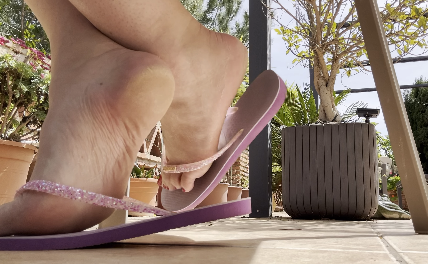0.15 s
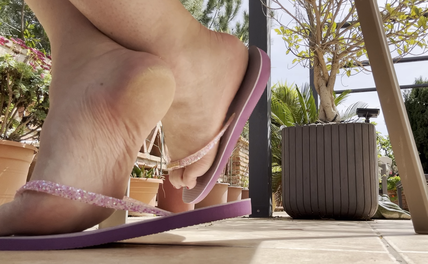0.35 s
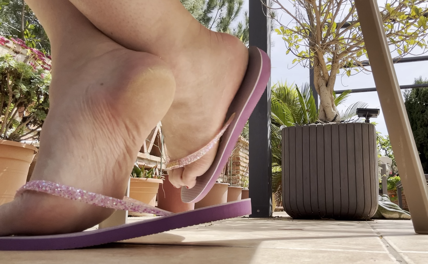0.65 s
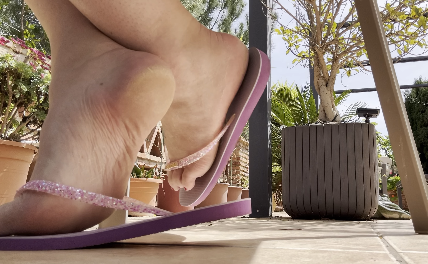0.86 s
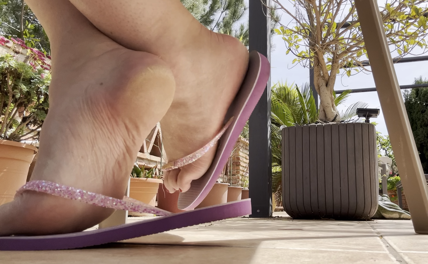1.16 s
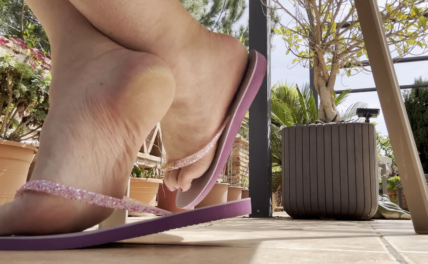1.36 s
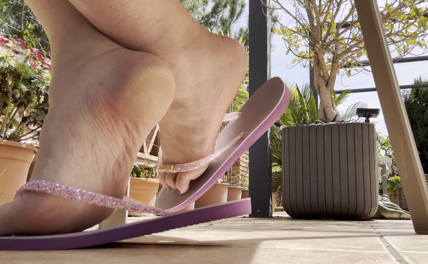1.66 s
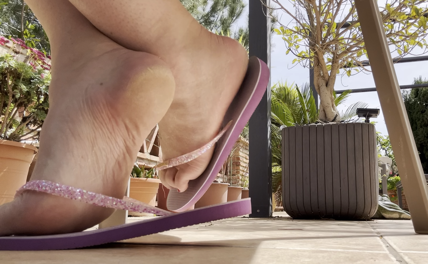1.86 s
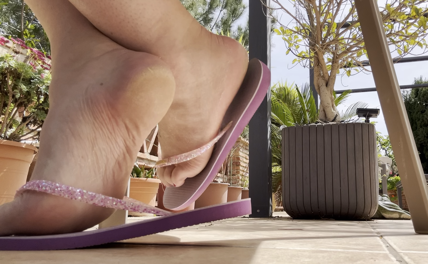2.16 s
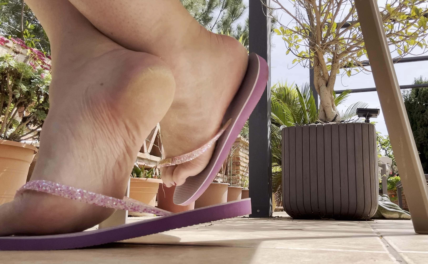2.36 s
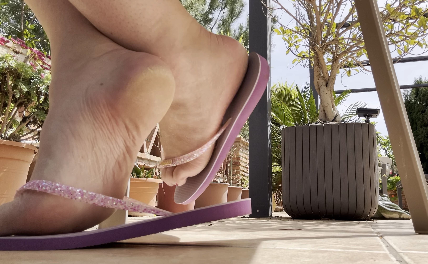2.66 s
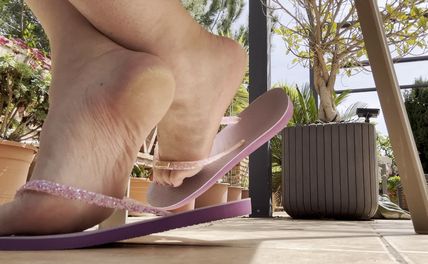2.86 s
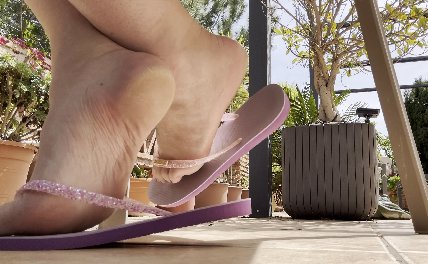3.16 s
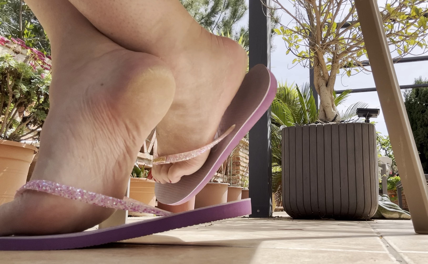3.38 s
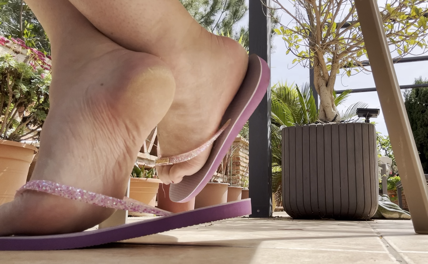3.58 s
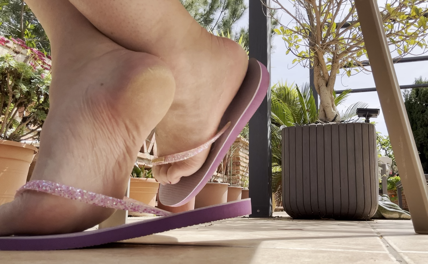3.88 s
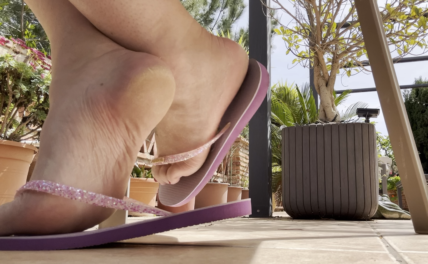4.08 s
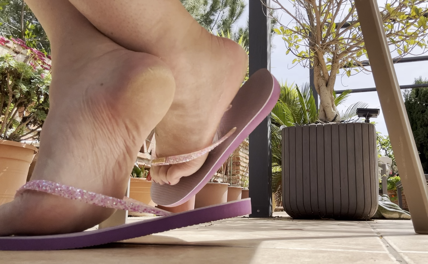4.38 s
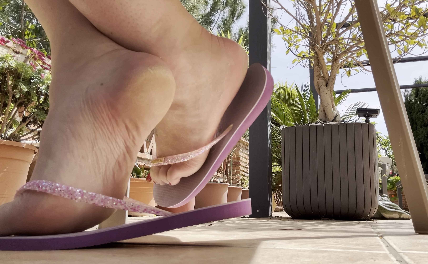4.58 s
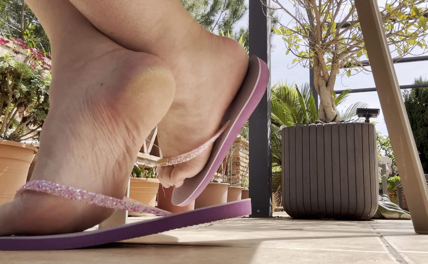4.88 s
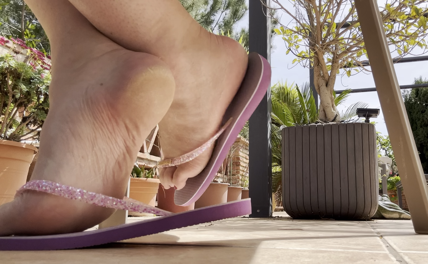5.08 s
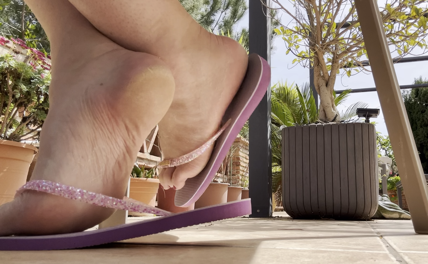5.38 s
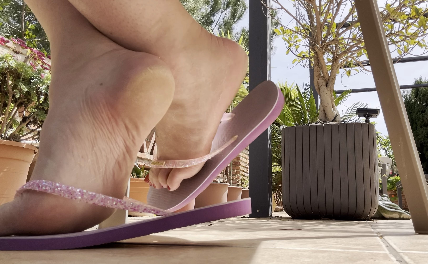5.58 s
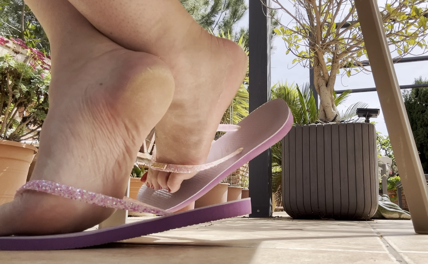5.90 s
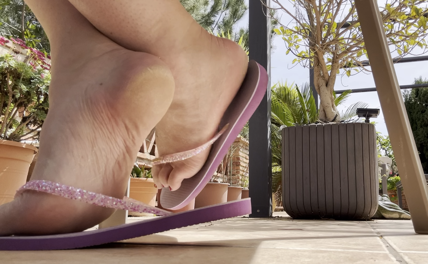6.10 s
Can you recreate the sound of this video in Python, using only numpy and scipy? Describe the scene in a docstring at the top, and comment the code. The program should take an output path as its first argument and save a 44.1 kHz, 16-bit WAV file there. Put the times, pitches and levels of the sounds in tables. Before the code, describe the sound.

A foam flip-flop slaps a bare heel about three times a second, crisp and close, over faint outdoor hum and low wind rumbles.

```python
"""On a tiled terrace, a foam sandal hanging from a foot slaps the heel about three times a second, near a phone.
Each slap adds shaped noise (first touch with escaping air, crack) to fading sine tones (hollow pop, thud, sway).
Delayed copies and a fading noise tail are the answer of the tiles and near surfaces.
Wind is noise that swells on the microphone ports; far traffic, leaves and the microphones are steadier noise.
The phone makes the bass mono below a drifting corner and cuts the highest treble."""
import sys
import numpy as np
from scipy import signal
from scipy.fft import rfft, irfft, next_fast_len
from scipy.io import wavfile
from scipy.ndimage import uniform_filter1d, map_coordinates

SR = 44100
rng = np.random.default_rng(int(sys.argv[2]) if len(sys.argv) > 2 else 0)


def unload_audio(sound):
    """Save the sound as a 16-bit wav file, at the path given as the first command line argument."""
    columns = np.transpose(np.atleast_2d(sound))
    # keep every value between -1 and 1, then stretch to whole-number steps
    steps = np.round(np.clip(columns, -1, 1) * 32767)
    wavfile.write(sys.argv[1], SR, steps.astype(np.int16))


N = 275184

# Far surroundings: t/s, level/dB
FAR_LEVEL = [(0.0, -54.5), (0.22, -56.5), (0.48, -51), (0.94, -52), (1.51, -52.5), (2.83, -51.5),
             (3.3, -53), (3.58, -53.5), (3.72, -51.5), (4.22, -56.5), (5.13, -56.5), (5.61, -53.5),
             (6.24, -57.5)]
# Colour of the far hum: f/Hz, relative density/dB per Hz
HUM_COLOUR = [(40, -120), (90, -28), (180, -5.5), (280, -3), (380, -1), (520, -6), (750, -11.5), (950, -17),
              (1300, -57), (3000, -120)]
# Colour of the leaves and microphone hiss: f/Hz, relative density/dB per Hz
HISS_COLOUR = [(600, 1), (1000, 1.5), (2000, -2.5), (4000, -6.5), (7000, -9), (10000, -21), (13500, -12.5),
               (15800, -35), (16300, -50)]
# How alike the surroundings are left and right: f/Hz, likeness (-1 to 1)
FAR_LIKENESS = [(200, 1), (640, 0.24), (1400, -0.31), (3100, -0.13), (7000, 0.27), (15000, -0.34)]
HISS_DB, HISS_FOLLOWS = -56.5, 0.56  # dB when the far level is -53 dB; share of that level's swings

# Strength of the wind: t/s, deep buffeting/dB, faster buffeting/dB
WIND_LEVELS = [(0, -66, -67), (.7, -66, -62.5), (1.0, -55, -53), (1.6, -55.5, -50.5), (2.2, -49, -50),
               (2.5, -51, -57.5), (3.1, -52.5, -51), (3.3, -44.5, -53), (3.48, -53, -54),
               (3.58, -35.5, -35.5), (3.77, -39, -30.5), (3.82, -37, -20), (3.86, -35.5, -36.5),
               (4.05, -33, -38.5), (4.2, -56, -46), (4.4, -57.5, -49.5), (4.7, -48, -44), (4.92, -52, -52),
               (5.1, -53, -63), (5.35, -57, -54.5), (5.6, -50, -42), (5.87, -49.5, -48), (6.05, -65.5, -62),
               (6.24, -59, -77)]
# Colour of the deep buffeting: f/Hz, relative density/dB per Hz
DEEP_COLOUR = [(10, -120), (18, -41), (30, -15), (45, 4.5), (62, 13), (80, 6.5), (110, -7.5), (160, -58),
               (300, -120)]
# Colour of the faster buffeting: f/Hz, relative density/dB per Hz
FAST_COLOUR = [(25, -120), (60, -23), (90, -2.5), (120, 1), (160, -5.5), (220, -14), (320, -32.5),
               (700, -120)]
# Colour of the sharper eddies: f/Hz, relative density/dB per Hz
PUFF_COLOUR = [(40, -120), (100, -26), (200, 1.5), (400, -3), (700, -31), (1200, -38), (3000, -120)]
# Sharper eddies: t/s, level/dB, half length/s
PUFFS = [(3.78, -38, .04), (3.95, -48, .02), (4.47, -41.5, .03), (4.94, -45, .008), (5.7, -46, .02)]
# Single deep eddies that thump on the ports: t/s, level/dB
THUMPS = [(1.02, -46), (1.58, -44.5), (1.84, -45), (2.015, -36.5), (2.09, -32.5), (2.17, -37), (2.28, -41),
          (2.455, -36.5), (3.17, -33.5), (3.42, -50), (3.6, -29), (3.65, -30.5), (4.1, -36.5), (4.55, -46),
          (4.7, -43), (4.765, -42), (4.84, -44), (5.25, -48), (5.6, -42), (5.685, -44)]
THUMP_HALF_S = 0.014
# How alike the deep wind is on the two ports: f/Hz, likeness (-1 to 1)
DEEP_LIKENESS = [(45, 0.88), (80, 0.34)]
# The same for the faster wind: f/Hz, likeness (-1 to 1)
FAST_LIKENESS = [(30, 0.2)]

# Slaps: t/s, crack/dB (scales the whole slap), then against the crack:
# pop/dB, thud/dB, snap/dB, sheen/dB, first touch/dB, sway/dB
SLAPS = [(0.257, -17, -3.5, -6.5, -5.5, 0, -23.5, -27), (0.5586, -17.5, -2.5, -4.5, -4, -3.5, -22, -22),
         (0.8201, -24, -8, -8.5, -6, 0.5, -26, -33), (1.0905, -16, -3, -6, -5, -3, -22, -10.5),
         (1.3879, -16, -2.5, -7.5, -6.5, 1.5, -25, -13), (1.7184, -17.5, -3, -6.5, -4, -5, -27, -12),
         (2.0375, -19.5, -6.5, -9.5, -6, 1.5, -28, -13), (2.3293, -21, -3.5, -10, -10, -3.5, -23, -9),
         (2.627, -14, -7.5, -14, -11.5, -7, -21.5, -14),
         (2.9314, -15, -3.5, -10.5, -2.5, 2.5, -28.5, -10.5),
         (3.2296, -15, -4.5, -10, -5.5, -2, -27.5, -10), (3.5304, -16, -3, -8, -6.5, -1.5, -22, -19),
         (3.7762, -19, -2.5, -7.5, -4, 2.5, -21.5, -18), (4.021, -23.5, -3, -5.5, -5.5, -3, -27.5, -16),
         (4.2756, -16.5, -2, -8, -3.5, -0.5, -24, -33), (4.4825, -24, -3.5, -7.5, -8, -5.5, -28, -22),
         (4.8004, -15.5, -4, -8.5, -6, -4, -27, -26), (5.0945, -19, -1.5, -7, -1.5, -3, -26, -18),
         (5.3953, -16, -4, -10, -3.5, -4, -26, -19), (5.6981, -17.5, -7, -12, -9, -9, -33, -28),
         (5.9858, -18.5, -1.5, -11, -2.5, -3, -27, -17)]
# Escaping air: f/Hz, relative level/dB
SQUEEZE_COLOUR = [(300, -38), (700, 9), (2000, 4), (5000, 0), (8000, -4.5), (10500, -22), (13500, -1),
                  (17000, -29)]
# Main band of the crack: f/Hz, relative level/dB
CRACK_COLOUR = [(900, -51), (1700, -15.5), (2300, -14), (3100, 0.5), (3800, -4), (4500, 4), (5300, -8),
                (6500, -23)]
# Brighter snap within the crack: f/Hz, relative level/dB
SNAP_COLOUR = [(4800, -8.5), (5800, -0.5), (6600, -1), (7500, 0.5), (8800, -6), (9600, 0.5), (10500, -45),
               (11500, -46)]
# Highest sheen of the crack: f/Hz, relative level/dB
SHEEN_COLOUR = [(9500, -37), (11000, -2), (12500, -1), (13800, 8), (15000, 0.5), (15800, -14), (17000, -76)]
# Tones of the air pocket: f/Hz, relative level/dB, time to fade by 60 dB/s
POP_TONES = [(1197, 1.5, 0.013), (1309, 4, 0.011), (1493, -0.5, 0.013), (2230, 0.5, 0.011),
             (740, 6, 0.0085)]
# Tones of the bending sole: f/Hz, relative level/dB, time to fade by 60 dB/s
THUD_TONES = [(202, -4, 0.036), (255.6, -0.5, 0.029), (315.3, 0, 0.032), (374.6, -1, 0.029),
              (508, -11, 0.073)]
# Tones of the whole sole swinging back: f/Hz, relative level/dB, time to fade by 60 dB/s
SWAY_TONES = [(72.4, -3, 0.093), (135, -7, .03)]
SWAY_LATE_S = 0.0071
SCATTER_DB = 1.2  # typical change in each tone's strength from slap to slap
SMALL_SOLE_HZ = 165  # a small sole radiates little below this
# Echoes from the tiles, then near surfaces: delay/s, level/dB
ECHOES = [(.0008, -18.5), (.0095, -23), (0.0361, -29.5)]
# Fading of the terrace's tail: f/Hz, time to fade by 60 dB/s
TERRACE_FADE = [(200, 0.094), (1200, 0.082), (4000, 0.082), (8000, 0.077), (14000, 0.036)]
# Slap level at the left port over the right: f/Hz, level/dB
PORT_TILT = [(60, -8), (110, -6), (200, 2), (380, 9), (700, -2.5), (1290, -1), (2380, -2.5), (4400, -1),
             (8120, 1.5), (15000, -0.5)]
# Slap phase at the left port over the right: f/Hz, phase/radians
PORT_LEAD = [(0, 0), (600, 0), (900, .7), (1800, .9), (2500, 1.7), (3200, 2.3), (3600, 3.9), (4400, 4.4),
             (5000, 1.9), (6000, 2.6), (6700, 1), (7500, 0), (8800, -.9), (9200, -1.8), (17500, -12.7)]

# Corner below which the phone makes the sound mono: t/s, f/Hz
MONO_CORNER = [(0, 513), (1.15, 480), (2.6, 129), (3.5, 50.3), (4.65, 50), (4.85, 170), (5.8, 274),
               (6.24, 250)]
TOP_HZ = 17150  # the phone keeps nothing from here up


def amp(db):
    """Turn decibels into a plain multiplier."""
    return 10 ** (np.asarray(db) / 20)


def unit(x):
    """Scale a signal to an rms (average strength) of 1."""
    return x / np.sqrt(np.mean(x ** 2) + 1e-20)


def along(points, hz):
    """Read a curve of (frequency, value) points on a log frequency axis."""
    f, values = np.transpose(points)
    return np.interp(np.log(hz + 1), np.log(f + 1), values)


def curves(rows):
    """Draw each column after the time as one value per sample."""
    s, *columns = np.transpose(rows)
    return [np.interp(np.arange(N) / SR, s, column) for column in columns]


def wobble(rate):
    """A smooth random curve through rate random points a second."""
    knots = rng.standard_normal(int(N * rate / SR) + 4)
    return map_coordinates(knots, [np.arange(N) * rate / SR])


def filtered(x, response):
    """Change each frequency of x by the multiplier response(hz), which may be complex."""
    n = x.shape[-1]
    padded = next_fast_len(n + 4096)
    hz = np.fft.rfftfreq(padded, 1 / SR)
    return irfft(rfft(x, padded) * response(hz), padded)[..., :n]


def rush(spectrum, alike, patchy_db):
    """Stereo noise of rms 1: random patches vary its strength, mid and side set its likeness."""
    z = signal.stft(rng.standard_normal((2, N)), nperseg=512)[2]
    patches = uniform_filter1d(rng.standard_normal(z.shape[1:]), size=5, axis=0)
    patches = uniform_filter1d(patches, size=12, axis=1)
    pair = signal.istft(z * amp(patchy_db * unit(patches)), nperseg=512)[1][:, :N]

    def mid_side_gains(hz):
        # this angle makes the left-right correlation equal the likeness
        angle = np.arccos(np.clip(along(alike, hz), -1, 1)) / 2
        return amp(along(spectrum, hz)) * [np.cos(angle), np.sin(angle)]

    mid, side = filtered(pair, mid_side_gains)
    return unit(np.array([mid + side, mid - side]))


def surroundings():
    """Far traffic hums; leaves and the microphones hiss, partly following the hum's slow level."""
    far_db, = curves(FAR_LEVEL)
    hiss_db = HISS_DB + HISS_FOLLOWS * (far_db + 53)
    hum = amp(far_db + 1.14 * wobble(9)) * rush(HUM_COLOUR, FAR_LIKENESS, patchy_db=1.56)
    hissing = amp(hiss_db + 1.4 * wobble(4.6)) * rush(HISS_COLOUR, FAR_LIKENESS, patchy_db=0.3)
    return hum + hissing


def even(x):
    """Take most of the swelling out of narrow stereo noise; its centre ends at rms 1."""
    envelope = np.abs(signal.hilbert(x.mean(0), next_fast_len(N))[:N])
    level = uniform_filter1d(envelope, size=600)
    x = x / (level + .35)
    return x / np.std(x.mean(0))


def wind():
    """Eddies roll over the ports, differently on each; the sharpest reach higher in pitch."""
    t = np.arange(N) / SR

    def bell(s, db, half):
        return amp(db) * np.exp(-((t - s) / half) ** 2)

    deep_db, fast_db = curves(WIND_LEVELS)
    thumps = sum(bell(s, db, THUMP_HALF_S) for s, db in THUMPS)
    deep_level = np.hypot(amp(deep_db + 2.5 * wobble(16)), thumps)
    deep = deep_level * even(rush(DEEP_COLOUR, DEEP_LIKENESS, patchy_db=0))
    lumps = amp(1.6 * np.array([wobble(24), wobble(24)]))  # separate swelling on each port
    fast = amp(fast_db) * unit(lumps * rush(FAST_COLOUR, FAST_LIKENESS, patchy_db=-2.0))
    puff_level = sum(bell(*row) for row in PUFFS)
    puffs = puff_level * rush(PUFF_COLOUR, FAST_LIKENESS, patchy_db=1.5)
    return deep + fast + puffs


def hiss(spectrum, size):
    """A short stretch of coloured noise, rms 1."""
    return unit(filtered(rng.standard_normal(size), lambda hz: amp(along(spectrum, hz))))


def colour_click(spectrum, size, at):
    """A single click with the colour of the spectrum, rms 1."""
    impulse = 1.0 * (np.arange(size) == at)
    return unit(filtered(impulse, lambda hz: amp(along(spectrum, hz))))


def burst(t, start, t60):
    """A quick rise at start, then a fade by 60 dB in t60 seconds."""
    since = np.maximum(t - start, 0)
    return (1 - np.exp(-since / 0.0001)) * amp(-60 * since / t60)


def ringing(tones, t, sign, attack):
    """Fading sine tones from t = 0, as of a struck body, each at a slightly new strength."""
    t = np.maximum(t, 0)
    ring = 0
    for hz, db, t60 in tones:
        fade = amp(db + SCATTER_DB * rng.normal() - 60 * t / t60)
        ring = ring + fade * np.sin(2 * np.pi * hz * t)
    return sign * ring * (1 - np.exp(-t / attack))


def small_sole(hz):
    """A small sole moves little air at low pitch: a second-order high-pass."""
    ratio = hz / SMALL_SOLE_HZ
    return (1j * ratio) ** 2 / (1 + 1.2j * ratio - ratio ** 2)


def terrace(click):
    """Scattered reflections: a fading noise tail, new for every slap and port."""
    hz, t, z = signal.stft(rng.standard_normal((2, len(click))), SR, nperseg=128)
    fade = amp(-60 * t / along(TERRACE_FADE, hz)[:, None])
    tail = signal.istft(z * fade, SR, nperseg=128)[1]
    tail = tail / np.linalg.norm(tail[0])
    tail = np.pad(tail, ((0, 0), (round(0.0024 * SR), 0)))  # it starts 2.4 ms late
    return signal.fftconvolve(click[None], tail, axes=1)[:, :len(click)]


def ports(hz):
    """How level and phase at the two microphone ports differ for a sound from the sandal's side."""
    log_level = np.log(amp(along(PORT_TILT, hz)))
    ratio = log_level + 1j * np.interp(hz, *np.transpose(PORT_LEAD))
    return np.exp(np.outer([.5, -.5], ratio))


def slaps():
    """Foam meets skin: first touch and escaping air, crack and pop, then the sole bends and sways back."""
    out = np.zeros((2, N + SR))
    before = round(.03 * SR)  # room for the first touch ahead of the slap
    size = SR // 5
    t = (np.arange(size) - before) / SR
    for s, db, pop_db, thud_db, snap_db, sheen_db, touch_db, sway_db in SLAPS:
        squeeze = burst(t, -0.0118, 0.026) + .5 * burst(t, -0.0053, 0.35)
        touch = amp(touch_db) * hiss(SQUEEZE_COLOUR, size) * squeeze * (t < .001)
        layers = [(CRACK_COLOUR, burst(t, 0.00072, 0.0079)),
                  (SNAP_COLOUR, amp(snap_db) * burst(t, 0.00037, 0.016)),
                  (SHEEN_COLOUR, amp(sheen_db) * burst(t, 0.00027, 0.0065))]
        crack = sum(shape * hiss(spectrum, size) for spectrum, shape in layers)
        pop_ring = ringing(POP_TONES, t - .0003, sign=-1.02, attack=0.00093)
        pop = amp(pop_db) * filtered(pop_ring, small_sole)
        thud_ring = ringing(THUD_TONES, t - .0022, sign=0.93, attack=0.0011)
        thud = amp(thud_db) * filtered(thud_ring, small_sole)
        sway = amp(sway_db) * ringing(SWAY_TONES, t - SWAY_LATE_S, sign=-1.05, attack=0.0049)
        direct = touch + crack + pop + thud + sway
        echoes = sum(amp(echo_db) * np.pad(direct, (round(lag * SR), 0))[:size] for lag, echo_db in ECHOES)
        # the scattered sound carries the average colour of the crack, not its fine grain
        click = sum(np.std(shape) * colour_click(spectrum, size, before) for spectrum, shape in layers)
        diffuse = terrace(amp(-10.5) * (click + pop + thud))
        first = round(s * SR) - before
        out[:, first:first + size] += amp(db) * (filtered(direct + echoes, ports) + diffuse)
    return out[:, :N]


def scene():
    """Add the surroundings, the wind and the slaps."""
    return surroundings() + wind() + slaps()


def record(dry):
    """Remove the left-right difference below a slowly drifting corner, and everything from TOP_HZ up."""
    mid, side = (dry[0] + dry[1]) / 2, (dry[0] - dry[1]) / 2
    hz, t, z = signal.stft(side, SR, nperseg=2048)
    ratio = hz[:, None] / np.interp(t, *np.transpose(MONO_CORNER))
    steep_gain = 1 / np.sqrt(1 + (ratio + 1e-3) ** -40.0)
    side = signal.istft(z * steep_gain, SR, nperseg=2048)[1][:N]
    return filtered(np.array([mid + side, mid - side]), lambda hz: hz < TOP_HZ)


dry = scene()
out = record(dry)
unload_audio(out)
```